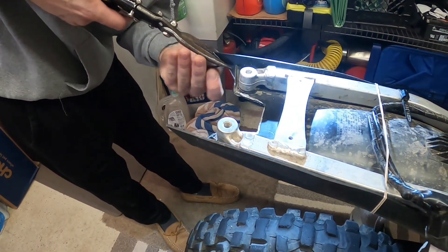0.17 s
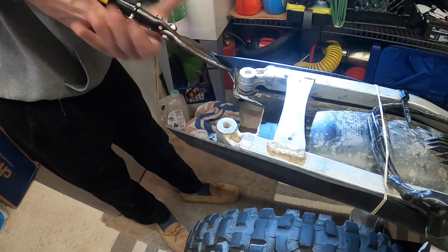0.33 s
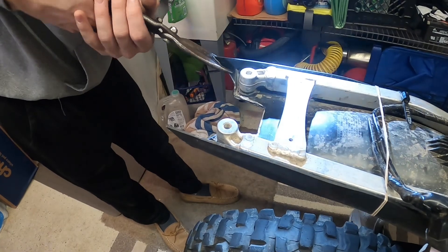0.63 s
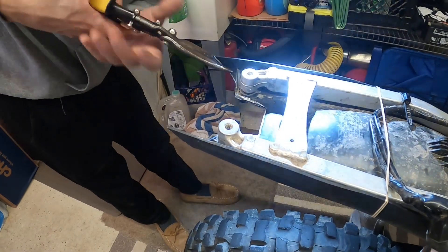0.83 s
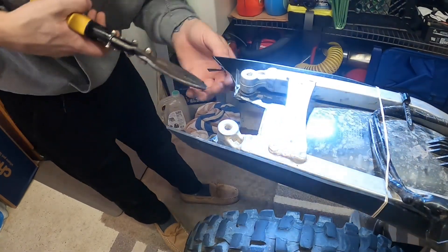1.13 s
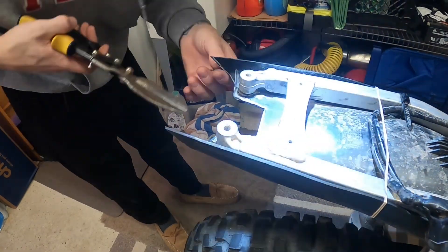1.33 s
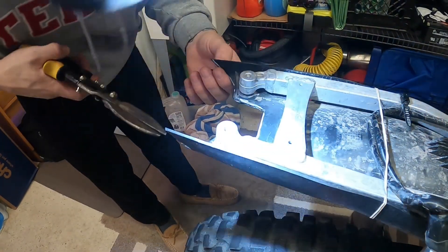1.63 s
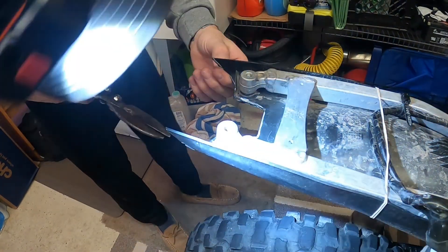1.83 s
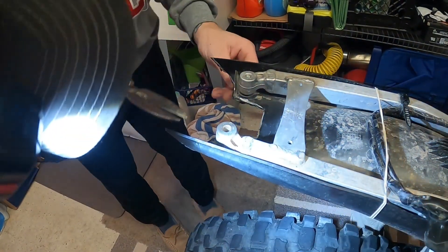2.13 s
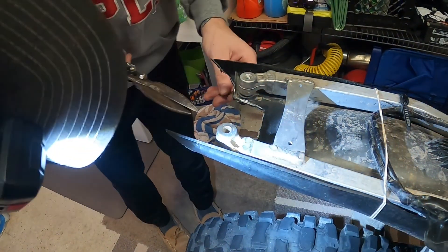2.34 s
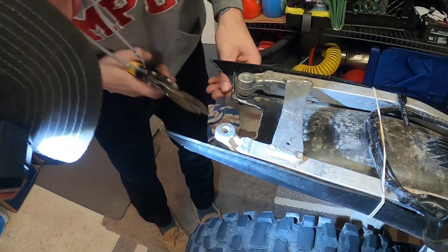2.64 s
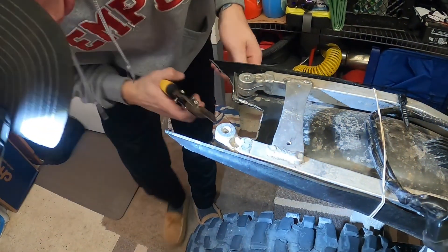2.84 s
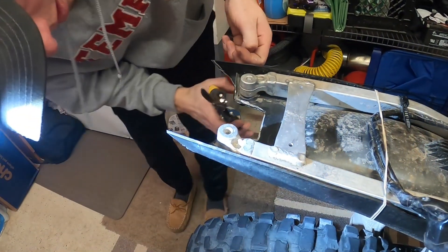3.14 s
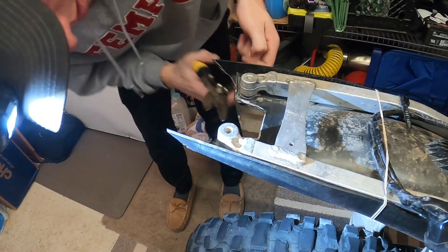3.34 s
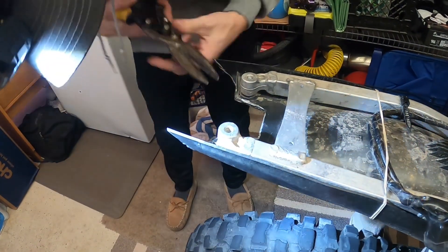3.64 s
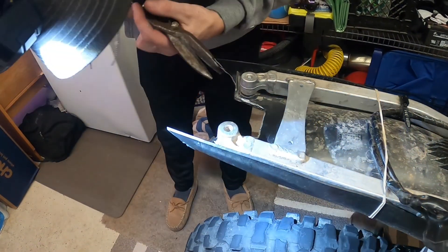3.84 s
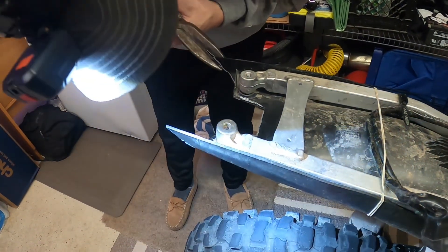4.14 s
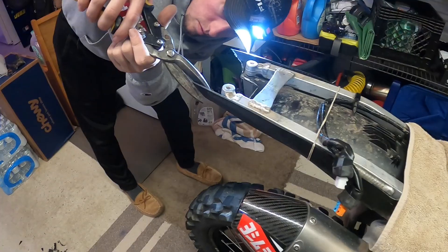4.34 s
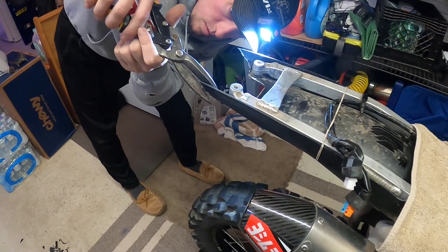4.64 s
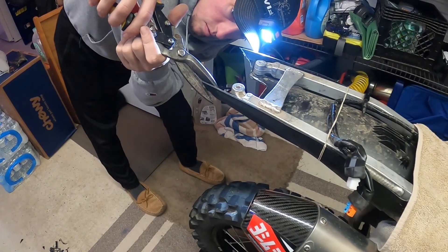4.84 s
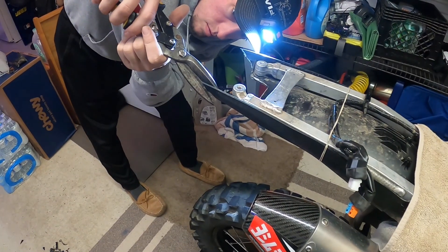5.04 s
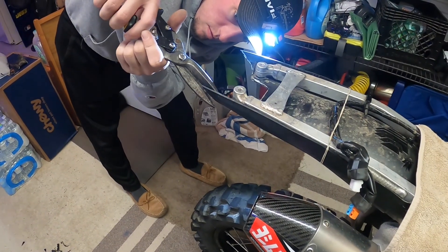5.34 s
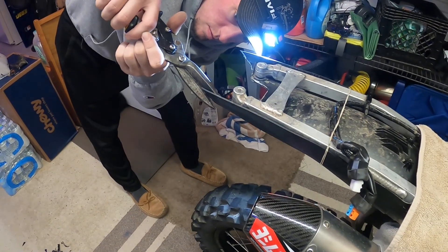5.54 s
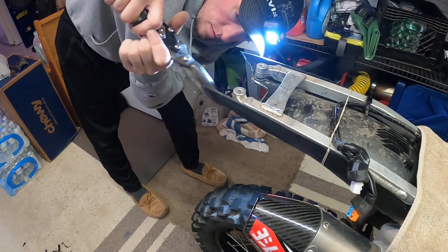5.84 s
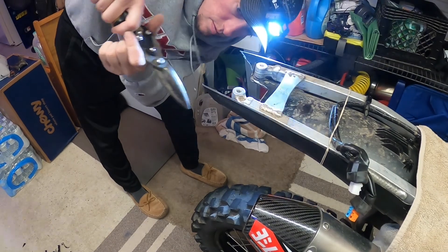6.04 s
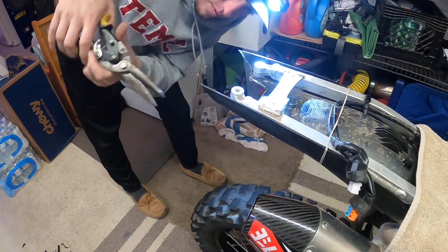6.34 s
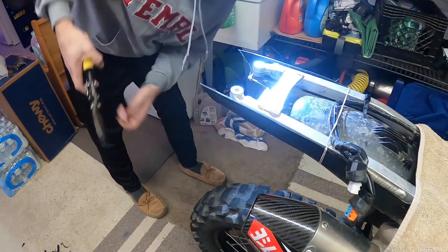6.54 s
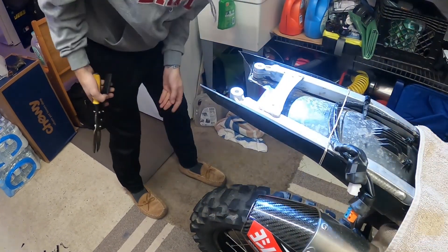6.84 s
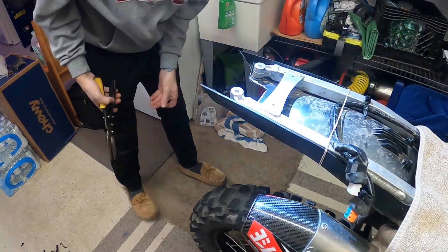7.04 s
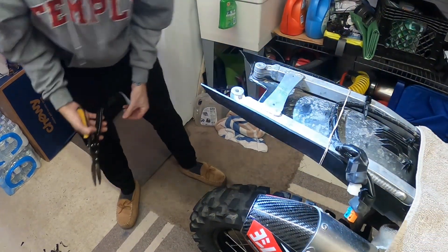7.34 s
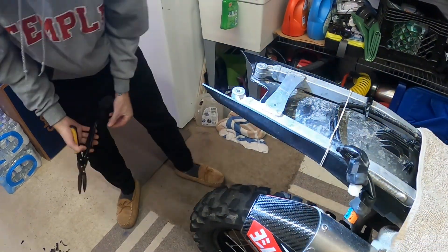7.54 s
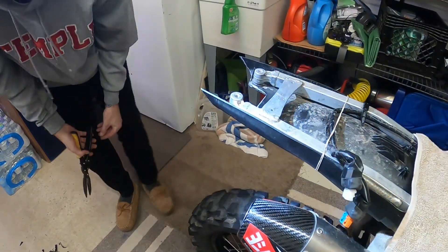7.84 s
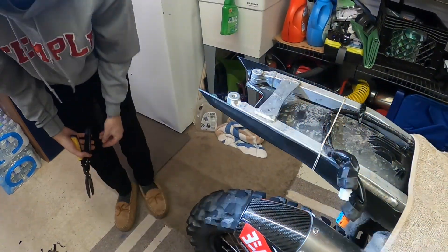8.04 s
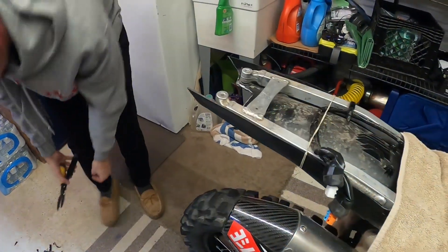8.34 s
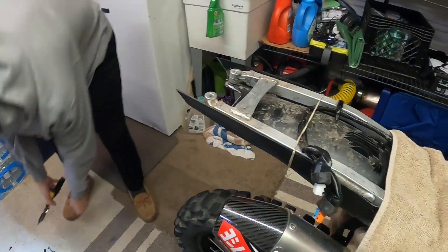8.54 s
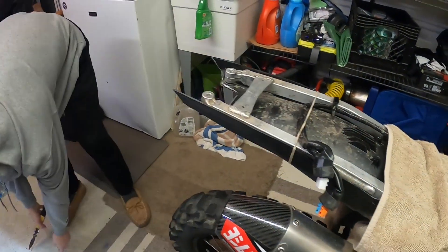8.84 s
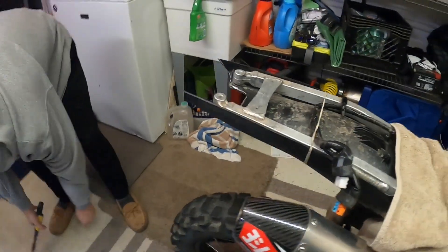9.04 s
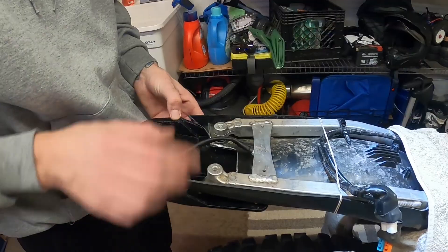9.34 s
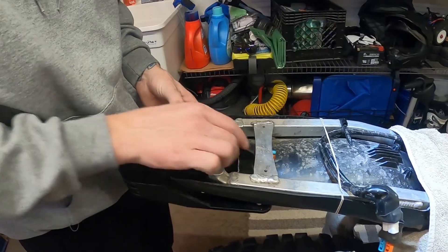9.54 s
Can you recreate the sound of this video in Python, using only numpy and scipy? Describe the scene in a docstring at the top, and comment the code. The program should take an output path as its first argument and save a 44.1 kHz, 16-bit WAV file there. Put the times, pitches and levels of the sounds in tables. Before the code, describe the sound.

A small workshop, close mono pickup with short echo; a low, slowly beating motor hum, soft rumble and faint hiss throughout. From 0.2 to 1.4 s, faint steel clicks and blade rubs, densest around 1 s, with a small plastic crack at 0.8 and light sleeve rustles. Hollow plastic knocks cluster at 1.8-1.9 and 2.1-2.3 s. Cloth swishes between 2.7 and 3.7 s with tiny clicks near 3. Around 4.2 s come soft bites and a dry tick. A dull tick at 5.5 and faint pivot sounds precede a loud, splintering snap at 5.8 s; the offcut clatters until 6.0. Faint clicks and soft fabric follow, with light knocks at 8.4 and 8.6 s alongside a brisk rustle. At 9.26 s a coarse, buzzy rasp bursts for about 0.2 s, catching briefly at the edge, then two small knocks at 9.65 s.

```python
"""Tin snips trim a plastic motorcycle fender in a small home workshop, over the hum of a motor.
Steel modes click and rub at the pivot; bites and tool knocks are played through the fender's modes.
One loud snap breaks through and the offcut clatters away; near the end a rasping stroke of dense slips.
Clothes rustle as filtered fibre slips; sines make the hum, filtered noise the rumble and hiss."""
import sys
import numpy as np
from scipy import signal
from scipy.fft import rfft, irfft, next_fast_len
from scipy.io import wavfile

SR = 44100
rng = np.random.default_rng(int(sys.argv[2]) if len(sys.argv) > 2 else 0)


def to_wav(s):
    """Save 16-bit WAV."""
    ch = np.atleast_2d(s).T  # columns
    pcm = np.round(np.clip(ch, -1, 1) * 32767)  # PCM
    wavfile.write(sys.argv[1], SR, pcm.astype(np.int16))


N = 426888
TIME = np.arange(N) / SR
BLOW = TIME[:SR // 4]   # time axis of one contact

# Snips click at pivot and handles. Each row: start in s, favoured ring in Hz, relative level in dB,
# hardness in dB.
CLICKS = [(0.209, 1820, -71, -1), (0.462, 2340, -66.5, 2), (0.944, 3210, -59, 5.5),
          (0.973, 3000, -55.5, -10), (1.001, 2600, -58.5, -11), (1.022, 2800, -55.5, -15),
          (1.036, 2770, -53, -22), (1.071, 2790, -65, -8), (1.097, 3280, -64, 0), (1.119, 3360, -62, 1.5),
          (1.402, 3000, -67, -0.5), (2.677, 1250, -76, 8), (2.854, 1280, -71, 10),
          (2.986, 1080, -61.5, 2.5), (4.404, 1450, -67.5, -16.5), (5.55, 1050, -77, 14),
          (5.614, 4800, -75, 4), (5.665, 4610, -74, 11), (6.325, 4400, -75, 16), (6.346, 1200, -70, -6),
          (6.899, 1000, -70.5, -1), (6.998, 4700, -80, 21), (8.948, 4700, -72.5, 19)]
# Blades slide on each other. Each row: start in s, length in s, favoured ring in Hz, relative level in dB,
# hardness in dB.
SLIDES = [(1.025, 0.039, 2800, -59, -21), (1.09, .038, 3380, -68.5, -3), (1.312, 0.067, 2960, -69.5, -6),
          (5.6, .067, 4900, -77.5, 10.5), (6.23, .13, 4400, -80.5, 8.5)]
# Steel modes of the snips. Each row: frequency in Hz, relative strength in dB, t60 in s.
SNIPS_MODES = [(1238, -1.5, 0.022), (1600, -3, 0.0075), (2175, -7.5, 0.0052), (2719, -10, 0.025),
               (3070, 1, 0.011), (3480, -4.5, 0.0066), (4500, -2, 0.0012), (5340, -9, .008),
               (7500, 2.5, 0.0082), (8060, -9, .006)]
# Snips voicing, a row each for body, edge and sparkle: offset in dB, slope in dB per dB of hardness.
SNIPS_VOICE = [(0.5, 0), (-1.5, 0.15), (-11.5, 1)]
# Plastic cracks, and the snips clack or are put down. Each row: start in s, favoured ring in Hz,
# level in dB, hardness in dB, thump level in dB.
BITES_AND_KNOCKS = [(0.789, 590, -54, 3, -52), (1.839, 1420, -40, -0.5, -31.5), (1.874, 1200, -51, -9, -41),
                    (1.885, 1240, -42.5, 3, -35), (1.895, 824, -47.5, -2, -34), (2.074, 1200, -55, 6, -44),
                    (2.109, 3000, -43, -4, -43), (2.118, 782, -46.5, -2, -49), (2.125, 665, -51, -3, -40),
                    (2.257, 555.3, -57, -3.5, -45), (4.198, 610, -63, -9, -48), (4.242, 578, -64, -9, -52),
                    (4.311, 638, -68.5, -9.5, -52.5), (8.358, 1950, -52.5, 6.5, -59),
                    (8.397, 1550, -59, 11.5, -54), (8.588, 1600, -55, -1, -44), (9.63, 1670, -52.5, 6, -42),
                    (9.674, 1070, -50.5, 1, -58)]
# Plastic strains, the cut breaks through, the fender shudders. Each row: start in s, favoured ring in Hz,
# level in dB, hardness in dB, thump level in dB, tearing decay in s.
BREAK = [(5.812, 4430, -54, 3, -55, 0.0078), (5.821, 1180, -34, 5, -40.5, 0.0041),
         (5.8275, 4270, -34, 21.5, -26, .0017), (5.832, 2053, -33.5, 2.5, -18, 0.0092),
         (5.841, 1040, -30, 4, -26.5, 0.01), (5.852, 1678, -28, -4.5, -23, 0.0033),
         (5.8637, 3908, -35, -1.5, -29, 0.00065), (5.876, 640, -39, 5.5, -26.5, 0.042)]
# Offcut lands and tumbles. Each row: start in s, favoured ring in Hz, level in dB, hardness in dB,
# thump level in dB.
LANDINGS = [(5.938, 640, -39.5, -5, -33), (5.964, 1825, -49, 4, -40), (5.972, 580, -40.5, -12.5, -31)]
# One brief dull tick a third of a second before the snap: start in s, frequency in Hz, level in dB, t60 in s.
DULL_TICK = (5.5, 79.5, -19.5, 0.0044)
# Plastic modes of the fender. Each row: frequency in Hz, relative strength in dB, t60 in s.
FENDER_MODES = [(147, 4.5, 0.059), (216, 0.5, 0.048), (270, 0, 0.062), (444, -6.5, 0.037), (640, -4, 0.015),
                (1035, -1, 0.0083), (1180, -4.5, 0.0097), (1395, -4.5, 0.0098), (1750, -11.5, 0.012),
                (2130, -7.5, 0.011), (2563, -9.5, .012), (2844, -2, 0.015), (3302, -5, 0.02),
                (4340, -7.5, 0.01), (4960, -14.5, .01), (7100, 1, .005), (7960, -9.5, 0.019)]
# Fender voicing, a row each for body, edge and sparkle: offset in dB, slope in dB per dB of hardness.
FENDER_VOICE = [(0, 0), (-4.5, 0.4937), (-22, 1)]
# Thump, body, edge and sparkle. Each row: low edge in Hz, high edge in Hz, filter order.
REGISTERS = [(90, 470, 3), (550, 2400, 3), (2400, 4900, 3), (6700, 10600, 2)]
# Rasp spectrum at the edge. Each row: frequency in Hz, relative density in dB per Hz.
RASP_SPECTRUM = [(900, -16), (1500, -13), (2000, -3), (2650, 1.5), (3250, -6), (3800, 1.5), (4400, -3),
                 (5050, 4), (5700, -16), (6500, -13.5), (7400, -22.5), (8700, -22), (10000, -35.5),
                 (15500, -47)]
# Panel drone spectrum under the rasp. Each row: frequency in Hz, relative density in dB per Hz.
DRONE_SPECTRUM = [(88, -30), (150, 3.5), (178, 1.5), (254, -8), (373, -3.5), (538, -20), (624, -16),
                  (995, -12), (1180, -20.5), (1600, -28), (2080, -48), (3520, -120)]
# Edge catches during the stroke. Each row: time in s, extra level in dB.
CATCHES = [(9.265, 8), (9.311, 5)]
# Sleeve or trouser leg brushes past. Each row: peak time in s, swell in s, fade in s, rustle level in dB,
# hiss level in dB.
BRUSHES = [(.34, 0.035, 0.048, -71, -87), (.475, 0.0136, 0.038, -62.5, -72.5),
           (.74, .05, 0.12, -73.5, -89.5), (2.865, 0.06, 0.049, -59, -84.5), (3.0, .04, 0.037, -53, -76),
           (3.22, 0.072, .05, -61.5, -86), (3.38, 0.079, 0.0436, -58.5, -80), (3.6, 0.091, 0.095, -63, -85),
           (4.06, 0.12, 0.102, -75.5, -93), (4.32, 0.14, 0.08, -71, -91.5), (7.14, 0.055, .14, -68.5, -88),
           (7.26, 0.074, 0.17, -70.5, -79.5), (7.95, .035, .05, -65, -81.5), (8.3, 0.11, 0.101, -72.5, -88),
           (8.591, 0.00426, .05, -53.5, -65.5), (8.78, 0.088, 0.1073, -60.5, -78),
           (9.07, .012, .14, -62, -73)]
# Soft fabric hiss while the worker moves. Each row: start in s, end in s, level in dB.
MOVES = [(2.654, 3.9, -81.5), (6.35, 7.55, -83), (7.9, 8.55, -82), (8.55, 9.26, -77.5)]
# Fabric rustle spectrum. Each row: frequency in Hz, relative density in dB per Hz.
RUSTLE_SPECTRUM = [(350, -40), (600, -6.5), (841, -9.5), (1020, -1), (1350, -2), (1830, -6), (2200, -8),
                   (2800, -11.5), (6000, -23.5), (7800, -55), (13200, -120)]
# Fabric hiss spectrum. Each row: frequency in Hz, relative density in dB per Hz.
HISS_SPECTRUM = [(3000, -14), (4800, 2), (6300, -0.5), (8200, -2.5), (9800, -16), (12000, -20.5),
                 (15000, -31.5)]
# Mains orders of the motor. Each row: multiple of the mains frequency, relative level in dB.
MAINS_ORDERS = [(2, -32.5), (4, -60)]
# Rotor orders of the motor. Each row: multiple of the rotor frequency, relative level in dB.
ROTOR_ORDERS = [(.295, -49.5), (.48, -51), (1, -38.5), (1.999, -55), (3, -54.5), (5, -66.5), (7, -70)]
# Hum level curve. Each row: time in s, gain in dB.
HUM_GAIN = [(0, -2), (4.2, -2.5), (4.45, -1), (9.2, -0.33), (9.68, -1.5)]
# Room rumble spectrum. Each row: frequency in Hz, relative density in dB per Hz.
RUMBLE_SPECTRUM = [(20, -12), (50, -2), (80, 4), (160, 0), (220, -12), (300, -18.5), (400, -23), (600, -34),
                   (1200, -74.5)]
# Still-air spectrum. Each row: frequency in Hz, relative density in dB per Hz.
AIR_SPECTRUM = [(600, -8), (850, -11), (1300, -9), (2200, -17.5), (3200, -20.5), (4500, -21), (6000, -25),
                (7500, -28.5), (9500, -44), (14000, -50)]
# Faint narrow hiss. Each row: start in s, end in s, centre in Hz, level in dB.
# A row that ends before it starts stays silent.
WHINES = [(0, 2.3, 2098, -85), (4.25, 4.2, 4420, -93)]
# Room decay. Each row: frequency in Hz, t60 in s.
ROOM_T60 = [(150, 0.29), (500, 0.29), (1400, 0.19), (4500, 0.14), (8000, 0.11), (14000, 0.1)]

BITE_TEAR_S, LANDING_TEAR_S = 0.0049, 0.0052   # decay constants
REBOUND_S, REBOUND_LOSS_DB = 0.011, 10
RING_LIFT_DB = 4.5
STROKE_START_S, STROKE_ATTACK_S, STROKE_HOLD_S = 9.258, 0.0044, 0.15
STROKE_DB, STROKE_SAG_DB_PER_S, STROKE_RELEASE_DB_PER_S = -29, 22.5, 118
DRONE_DB, DRONE_RELEASE_DB_PER_S = -6.5, 90   # relative to the scrape
CATCH_S = 0.0024
MOVE_FADE_S = 0.055
MAINS_HZ, ROTOR_HZ = 60, 59.2
RUMBLE_DB, AIR_DB = -45.5, -73
TICK_S, TICK_DB = 4.2195, -31.5
CUTOFF_HZ = 15600


def snips():
    """Loose steel parts click; the blades stick and slip as they pass each other."""
    out = np.zeros(N)
    for s, hz, db, hardness_db in CLICKS:
        jolts = shower(tear_s=0.0022, splinter=0.24)
        click = signal.fftconvolve(jolts, ringing(SNIPS_MODES, crack=2.0))[:len(BLOW)]
        levels_db = register_levels(SNIPS_VOICE, hz, db, hardness_db)
        add(out, s, voiced(favoured(click, hz, width_hz=390, boost_db=9), levels_db, span_s=0.0074))
    for s, length_s, hz, db, hardness_db in SLIDES:
        stroke = np.sqrt(np.sin(np.pi * np.minimum(BLOW / length_s, 1)).clip(0))
        slips = stroke * grains(per_s=4800, spread_db=-0.5, size=len(BLOW))
        scrape = signal.fftconvolve(slips, ringing(SNIPS_MODES, crack=4.5))
        levels_db = register_levels(SNIPS_VOICE, hz, db, hardness_db)
        add(out, s, voiced(favoured(scrape, hz, width_hz=490, boost_db=14.0), levels_db, span_s=length_s))
    return out


def nibbles():
    """Short bites and broad tool knocks, all played through the fender's modes."""
    rows = [(*contact, BITE_TEAR_S) for contact in BITES_AND_KNOCKS]
    return fractures(rows, splinter=0.22, boost_db=3.5, contact_hz=3230)


def breakthrough():
    """A brief dull tick; then the cut snaps in a run of cracks and the offcut clatters."""
    out = fractures([*BREAK, *bounces()], splinter=0.42, boost_db=6, contact_hz=13990)
    s, hz, db, t60_s = DULL_TICK
    decay = np.exp(-np.log(1000) * BLOW / t60_s)
    add(out, s, from_db(db) * np.sin(2 * np.pi * hz * BLOW) * decay)
    return out


def bounces():
    """Each landing of the offcut and one weaker rebound."""
    rows = []
    for s, hz, db, hardness_db, thump_db in LANDINGS:
        for k in range(2):
            loss_db = k * REBOUND_LOSS_DB
            rows.append((s + k * REBOUND_S, hz, db - loss_db, hardness_db, thump_db - loss_db, LANDING_TEAR_S))
    return rows


def fractures(rows, splinter, boost_db, contact_hz):
    """Each contact rings the fender's modes; a lower contact_hz rounds off the blow."""
    out = np.zeros(N)
    rounding = signal.butter(2, contact_hz, fs=SR, output="sos")
    for s, hz, db, hardness_db, thump_db, tear_s in rows:
        jolts = signal.sosfilt(rounding, shower(tear_s, splinter) + 1e-18)
        sound = signal.fftconvolve(jolts, ringing(FENDER_MODES, crack=3.4))[:len(BLOW)]
        levels_db = [thump_db] + register_levels(FENDER_VOICE, hz, db, hardness_db)
        add(out, s, voiced(favoured(sound, hz, 0.14 * hz, boost_db), levels_db, span_s=0.013))
    return out


def shower(tear_s, splinter):
    """A contact gives way: small slips lead within a millisecond to one jolt, then die out."""
    lead = SR // 1000
    swell = np.minimum(np.arange(len(BLOW)) / lead, 1) ** 2
    slips = grains(per_s=9000, spread_db=2.5, size=len(BLOW))
    jolts = splinter * swell * slips * np.exp(-BLOW / tear_s)
    jolts[lead] = 1
    return jolts


def ringing(modes, crack):
    """One blow: damped modes of randomly varied strength, plus the bare contact click."""
    hz, db, t60_s = np.transpose(modes)[:, :, None]
    strength = from_db(db + 2 * rng.standard_normal(hz.shape))
    decay = np.exp(-np.log(1000) * BLOW / t60_s)
    ring = np.sum(strength * decay * np.cos(2 * np.pi * hz * BLOW), axis=0)
    ring[0] += crack
    return ring


def favoured(sound, hz, width_hz, boost_db):
    """The point of contact favours one resonance: a two-pole peak is added."""
    r = np.exp(-np.pi * width_hz / SR)
    zeros = (1 - r * r) / 2 * np.array([1, 0, -1])
    poles = [1, -2 * r * np.cos(2 * np.pi * hz / SR), r * r]
    return sound + from_db(boost_db) * signal.lfilter(zeros, poles, sound + 1e-18)


def register_levels(voice, hz, db, hardness_db):
    """A harder contact has more treble; the register of its favoured ring is lifted."""
    levels_db = []
    for (base_db, slope), (low, high, order) in zip(voice, REGISTERS[-len(voice):]):
        levels_db.append(db + base_db + slope * hardness_db + RING_LIFT_DB * (low < hz < high))
    return levels_db


def voiced(sound, levels_db, span_s):
    """Set the energy of each register over span_s; three levels leave out the thump."""
    out = 0
    for db, (low, high, order) in zip(levels_db, REGISTERS[-len(levels_db):]):
        part = band(sound, low, high, order=order)
        out = out + from_db(db) * part / np.sqrt(np.sum(part ** 2) / (span_s * SR) + 1e-20)
    return out


def rasp():
    """Dense, uneven slips along the cut edge; the panel's drone beneath fades sooner on lift-off."""
    age_s = np.maximum(TIME - STROKE_START_S, 0)
    lifted_s = np.maximum(age_s - STROKE_HOLD_S, 0)
    level_db = STROKE_DB - STROKE_SAG_DB_PER_S * age_s - STROKE_RELEASE_DB_PER_S * lifted_s
    level_db += sum(db * np.exp(-((TIME - s) / CATCH_S) ** 2) for s, db in CATCHES)
    slips = grains(per_s=12000, spread_db=2) * from_db(1.5 * drift(180))
    drone_gain = from_db(DRONE_DB - DRONE_RELEASE_DB_PER_S * lifted_s)
    scrape = coloured(slips, RASP_SPECTRUM) + drone_gain * coloured(slips, DRONE_SPECTRUM)
    return np.minimum(age_s / STROKE_ATTACK_S, 1) * from_db(level_db) * scrape


def clothes():
    """Fabric on fabric: countless fibre slips, swelling and fading with each brush."""
    rustle = coloured(grains(per_s=17000, spread_db=3.0), RUSTLE_SPECTRUM)
    hiss = coloured(grains(per_s=7000, spread_db=4.0), HISS_SPECTRUM)
    moving = np.zeros(N)
    for start, end, db in MOVES:
        inside_s = np.minimum(TIME - start, end - TIME)
        moving += from_db(db) * np.clip(0.5 + inside_s / MOVE_FADE_S, 0, 1)
    rustle_power, hiss_power = np.zeros(N), moving ** 2
    for s, swell_s, fade_s, rustle_db, hiss_db in BRUSHES:
        distance = np.maximum((s - TIME) / swell_s, (TIME - s) / fade_s)
        brush = np.exp(-np.minimum(distance, 20))
        rustle_power += (from_db(rustle_db) * brush) ** 2
        hiss_power += (from_db(hiss_db) * brush) ** 2
    return np.sqrt(rustle_power) * rustle + np.sqrt(hiss_power) * hiss


def motor():
    """Magnetic hum beats slowly against the orders of the slightly slower rotor."""
    out = np.zeros(N)
    groups = [(MAINS_HZ, MAINS_ORDERS, 0.3), (ROTOR_HZ, ROTOR_ORDERS, 0.6)]
    for base_hz, orders, waver_db in groups:
        turns = base_hz * TIME + 0.03 * drift(0.63)
        for multiple, db in orders:
            level = np.sqrt(2) * from_db(db + waver_db * drift(4.5))
            out += level * np.sin(2 * np.pi * (multiple * turns + rng.random()))
    gain_s, gain_db = np.transpose(HUM_GAIN)
    return out * from_db(np.interp(TIME, gain_s, gain_db))


def air():
    """Low rumble and soft hiss of the room as filtered noise, with gated narrow hiss."""
    out = from_db(RUMBLE_DB) * coloured(rng.standard_normal(N), RUMBLE_SPECTRUM)
    out += from_db(AIR_DB) * coloured(rng.standard_normal(N), AIR_SPECTRUM)
    for start, end, hz, db in WHINES:
        whine = rms_one(band(rng.standard_normal(N), hz - 90, hz + 90))
        out += from_db(db) * whine * ((TIME > start) & (TIME < end))
    return out


def tick():
    """A single dry tick: one exponential pulse, no ring."""
    out = np.zeros(N)
    add(out, TICK_S, from_db(TICK_DB) * np.exp(-BLOW / 0.0006))
    return out


def workshop():
    """Echo of a cluttered room: diffuse, building up, dying sooner in the treble; unit energy."""
    t = TIME[:SR * 3 // 5]
    edges_hz = np.geomspace(70, 16000, 12)
    echo = np.zeros(len(t))
    for low, high in zip(edges_hz, edges_hz[1:]):
        hz = np.sqrt(low * high)
        noise = rms_one(band(rng.standard_normal(len(t)), low, high)) * np.sqrt(high - low)
        decay = np.exp(-np.log(1000) * t / at_hz(ROOM_T60, hz))
        echo += noise * decay / np.hypot(1, hz / 6500)   # softer treble
    echo *= 1 - np.exp(-(t / 0.006) ** 2)
    return echo / np.sqrt(np.sum(echo ** 2))


def grains(per_s, spread_db, size=N):
    """Tiny slips at random moments, of random sign and exponentially spread dB size."""
    size_db = spread_db * np.minimum(rng.exponential(1, size), 4)
    slips = from_db(size_db) * rng.choice([-1, 1], size)
    return slips * (rng.random(size) < per_s / SR)


def drift(rate_hz):
    """Slow wander: unit-normal knots at rate_hz, joined by lines."""
    knots = rng.standard_normal(2000)
    return np.interp(TIME * rate_hz, np.arange(len(knots)), knots)


def coloured(x, spectrum):
    """Give a steady texture a spectrum; rms 1."""
    size = next_fast_len(len(x))
    hz = np.arange(size // 2 + 1) * SR / size
    shaped = irfft(rfft(x, size) * from_db(at_hz(spectrum, hz)), size)
    return rms_one(shaped[:len(x)])


def band(x, low, high, order=2):
    """Causal Butterworth band-pass."""
    sos = signal.butter(order, [low, high], "band", fs=SR, output="sos")
    return signal.sosfilt(sos, x + 1e-18)


def at_hz(points, hz):
    """Read a table on a log-frequency axis."""
    f, value = np.transpose(points)
    return np.interp(np.log(np.maximum(hz, 1)), np.log(f), value)


def from_db(db):
    """Decibels to gain."""
    return 10 ** (np.asarray(db) / 20)


def rms_one(x):
    """Scale to rms 1."""
    return x / np.sqrt(np.mean(x ** 2) + 1e-20)


def add(track, s, sound):
    """Mix a sound into a track at s seconds."""
    at = int(s * SR)
    track[at:at + len(sound)] += sound[:max(N - at, 0)]


def scene():
    """Mix to one channel; tool and plastic sounds each send a share to the room."""
    # sound, room send in dB
    sources = [(from_db(2.0) * snips(), -12), (nibbles(), -11.5), (breakthrough(), -11), (rasp(), -13)]
    direct = sum(sound for sound, wet_db in sources)
    send = sum(from_db(wet_db) * sound for sound, wet_db in sources)
    echo = signal.fftconvolve(send, workshop())[:N]
    return (direct + echo + clothes() + motor() + air() + tick())[None]


def record(dry):
    """Steep elliptic low-pass at the top of the band."""
    sos = signal.ellip(10, 0.1, 80, CUTOFF_HZ, fs=SR, output="sos")
    return signal.sosfilt(sos, dry)


dry = scene()
out = record(dry)
to_wav(out)
```